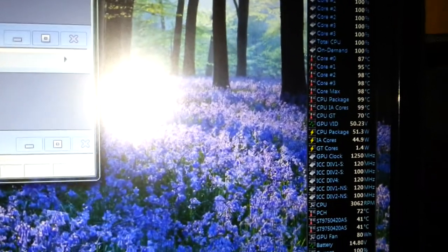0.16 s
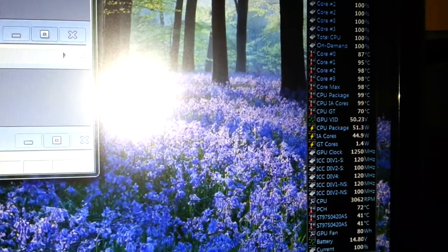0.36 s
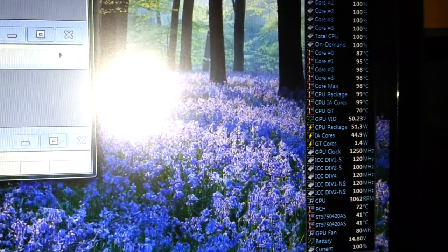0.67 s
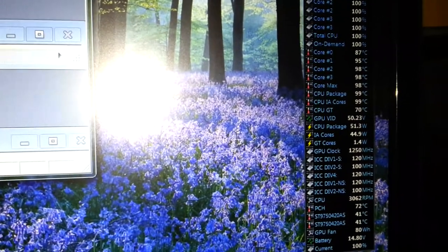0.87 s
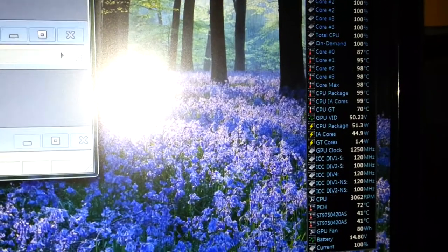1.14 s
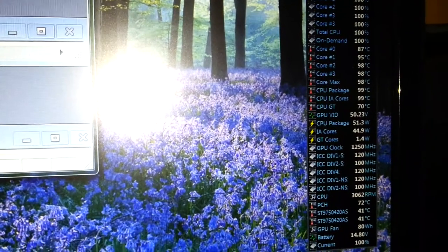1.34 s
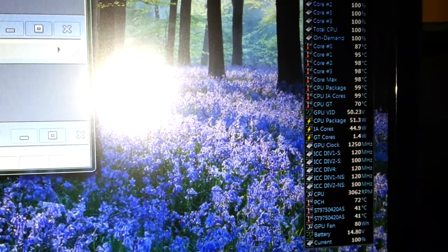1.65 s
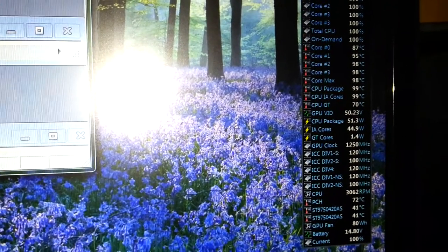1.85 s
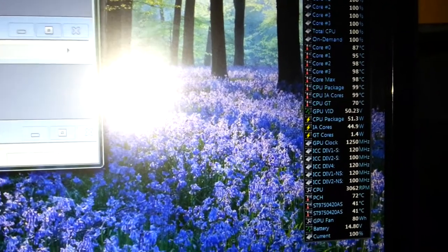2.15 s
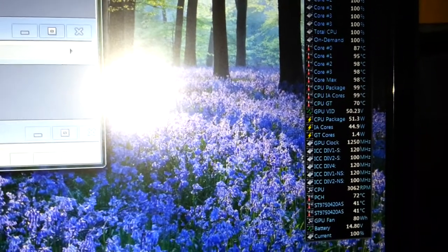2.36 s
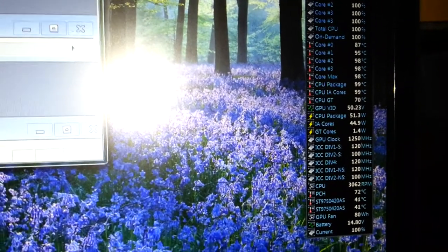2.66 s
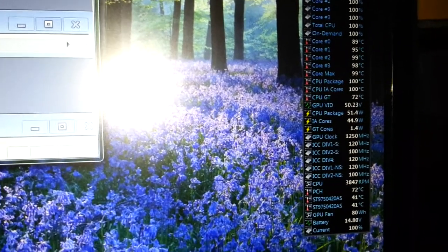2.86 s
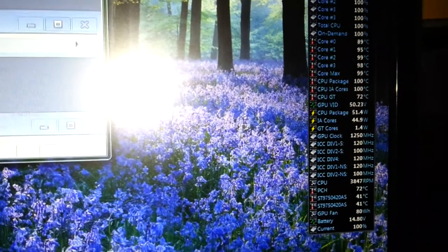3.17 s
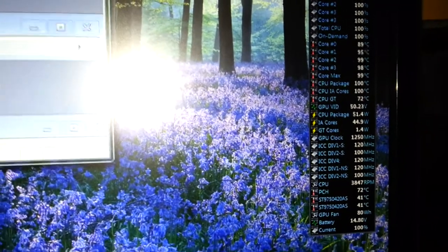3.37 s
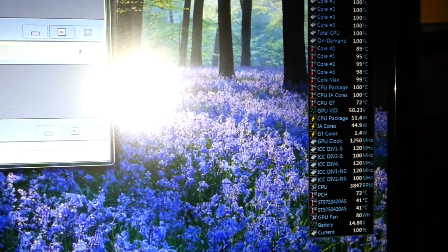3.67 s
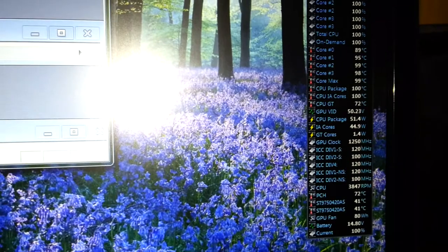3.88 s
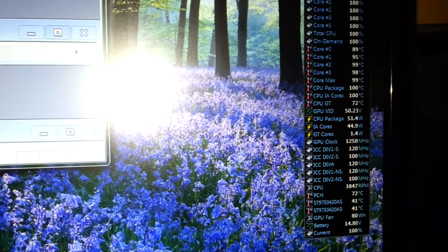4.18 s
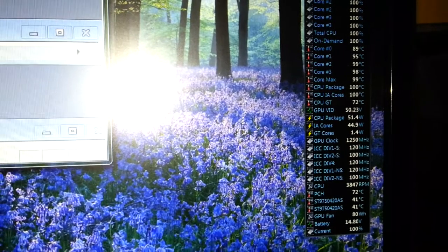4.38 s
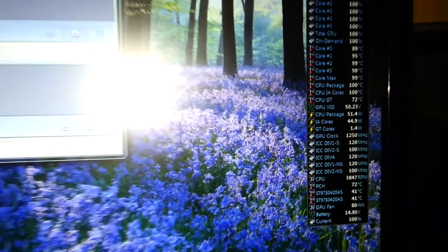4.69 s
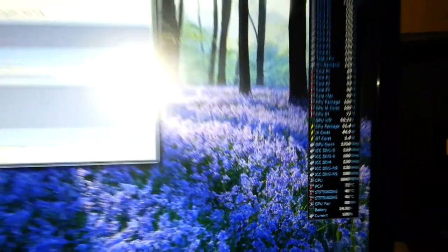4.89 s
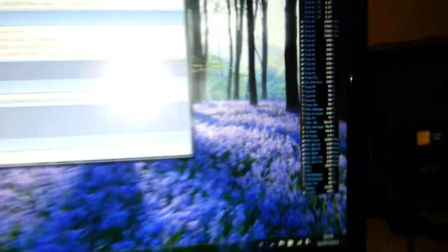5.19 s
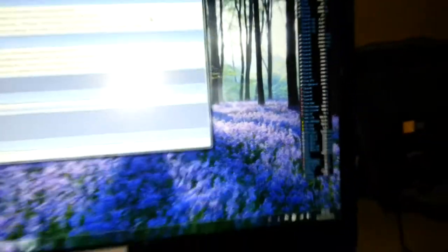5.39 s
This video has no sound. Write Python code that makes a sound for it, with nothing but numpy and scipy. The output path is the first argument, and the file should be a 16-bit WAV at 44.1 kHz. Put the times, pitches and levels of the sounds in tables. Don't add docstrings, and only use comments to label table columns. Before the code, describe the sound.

Close, steady whine and airy rush from a small computer blower, rising about a semitone near the start and softening as the microphone turns away.

```python
import sys
import numpy as np
from scipy import signal
from scipy.fft import rfft, irfft, next_fast_len
from scipy.io import wavfile
from scipy.ndimage import uniform_filter1d

SR = 44100
rng = np.random.default_rng(int(sys.argv[2]) if len(sys.argv) > 2 else 0)


def digitize_waveform(pressure):
    field = np.atleast_2d(pressure).T
    bounded = np.clip(field, -1, 1)
    quanta = np.round(bounded * 32767).astype(np.int16)
    wavfile.write(sys.argv[1], SR, quanta)


def linear_from_db(decibels):
    return 10 ** (np.asarray(decibels, float) / 20)


N = 243873
T = np.arange(N) / SR
SIZE = next_fast_len(N)
HZ = np.arange(SIZE // 2 + 1) * SR / SIZE

# before_hz, drift_hz_per_s, step_s, after_hz, settle_s
SPEED_STEP = (1208, 7.0, .71, 1269.4, .28)
BLADE_ORDERS = [
    (1, -40.5, -46.5, -1.53),
    (2, -49.5, -56.5, -1.3),
]
# slow_left_db, slow_right_db, turned_left_db, turned_right_db
ORDER_CHANGES = [
    (-3.5, 0.5, -11.5, -17),
    (1.5, -3, -14, 1),
]
# pitch_hz, left_db_rms, right_db_rms
MOTOR_LINES = [
    (896, -62, -70),
]
# freq_hz, left_db_per_hz, right_db_per_hz, common_share_0_1
RUSH_SPECTRUM = [(62, -109, -107, .05), (108, -108, -104, 0.03), (143, -102, -99, 0.22),
                 (282, -91, -89.5, 0.21), (438, -81, -79, 0.99), (527, -78.5, -78.5, 0.5),
                 (730, -79.5, -76, 1), (1025, -73.5, -77.5, 0.06), (1410, -71, -74, 0.51),
                 (2160, -76.5, -82, 0.24), (3530, -78, -80.5, 0), (4520, -78, -83, 0),
                 (5790, -89.5, -89.5, 0.25), (8730, -89.5, -91.5, 0.34), (11200, -93.5, -94, .1),
                 (14100, -97.5, -97, 0.2)]
# freq_hz, width_hz, left_db_per_hz, right_db_per_hz, turned_left_db, turned_right_db
LOW_RESONANCES = [(795, 108, -71.5, -73, -4, -24), (866, 85, -72, -100, -2, 0),
                  (1190, 91, -96, -71.5, 0, 3.5), (1257, 160, -71, -73.5, 3.5, -1),
                  (1557, 290, -74.5, -89, -3, 0), (1873, 140, -76, -75.5, -15, -2)]
MID_RESONANCES = [(2014, 140, -67, -75.5, 3, 3.3), (2220, 290, -66.5, -89, -1.5, 12),
                  (2170, 83, -80, -85, 0, 5), (2406, 143, -62, -82.5, -4.5, 6),
                  (2586, 110, -72.5, -73.5, -2, 1), (2763, 170, -64, -82, -6, 3)]
HIGH_RESONANCES = [(3200, 210, -84, -89, 2, 3), (3690, 120, -78.5, -86, 7.5, -11),
                   (3800, 140, -75, -92, -5, 0), (4020, 120, -73, -85, -6, 0),
                   (4355, 150, -74, -82.5, -7, -3), (4750, 410, -85, -87.5, -2, -2),
                   (5530, 180, -99, -104, 0, 0), (5970, 200, -92, -91, 0, -6), (6400, 200, -86, -90, 0, -2),
                   (8040, 1600, -95, -103, -17, -2)]
# start_s, peak_db, pitch_hz, t60_s, left_minus_right_db
CASE_TICKS = [
    (3.926, -46, 2600, .012, 6),
]
# freq_hz, threshold_db_per_hz
LINE_THRESHOLD = [(40, -102), (120, -98), (220, -101), (400, -120), (7000, -115), (8500, -94),
                  (10000, -91.5), (12000, -92.5), (14500, -93.5)]

FULL_HZ = SPEED_STEP[3]
FLOW_POWER = 3.2
CLOSER_DB_PER_S = 0.28
TURN_START_S, TURN_END_S = 4.57, 5.51
RUSH_TURNED_DB, DUCT_TURNED_DB = -2, -3
TONE_TURN_POWER = 3.1
LAG_S, LAG_FROM_HZ = 0.000376, 1043
DUCT_SHARE = 0.82
STEADY_ABOVE_HZ = 9500


def walk(rate_hz):
    hold = int(SR / rate_hz)
    levels = np.repeat(rng.standard_normal(N // hold + 1), hold)
    return 1.25 * uniform_filter1d(uniform_filter1d(levels, hold), hold)[:N]


def stereo_noise(gain, share):
    common, *own = rfft(rng.standard_normal((3, SIZE)))
    lag_s = LAG_S / (1 + (LAG_FROM_HZ / (HZ + 1)) ** 8)
    late = np.exp(-2j * np.pi * HZ * lag_s)
    share = np.clip(share, 0, 1)
    shared = np.sqrt(share) * common * np.array([late, np.ones_like(late)])
    pair = shared + np.sqrt(1 - share) * np.array(own)
    return irfft(pair * gain * np.sqrt(SR / 2), SIZE)[..., :N]


def turned():
    progress = np.clip((T - TURN_START_S) / (TURN_END_S - TURN_START_S), 0, 1)
    return np.sin(np.pi / 2 * progress) ** 2


def motor():
    out = 0
    for pitch_hz, left_db, right_db in MOTOR_LINES:
        level_db = np.array([[left_db], [right_db]]) + 2.9 * walk(2.97)
        out = out + np.sqrt(2) * linear_from_db(level_db) * np.sin(2 * np.pi * pitch_hz * T)
    return out


def ticks():
    out = np.zeros((2, N))
    for start_s, peak_db, pitch_hz, t60_s, pan_db in CASE_TICKS:
        age_s = np.maximum(T - start_s, 0)
        ring = np.sin(2 * np.pi * pitch_hz * age_s) * np.exp(-np.log(1000) * age_s / t60_s)
        out += linear_from_db(peak_db + np.array([[pan_db], [-pan_db]]) / 2) * ring
    return out


def rush(gain):
    freq_hz, *columns = np.transpose(RUSH_SPECTRUM)
    left_db, right_db, share = (np.interp(np.log(HZ + 1), np.log(freq_hz), c) for c in columns)
    pressure = linear_from_db(np.array([left_db, right_db]))
    out = 0
    for centre_hz in 62.5 * 2. ** np.arange(9):
        octave = np.cos(np.pi / 2 * np.clip(np.log2((HZ + 1) / centre_hz), -1, 1))
        fan_share = 1 / (1 + (centre_hz / STEADY_ABOVE_HZ) ** 3)
        swell = linear_from_db(.5 * walk(7)) * gain ** fan_share
        out = out + swell * stereo_noise(pressure * octave, share)
    return out


def duct(turn):
    out = 0
    turn = np.clip(turn, 0, 1)
    for group in (LOW_RESONANCES, MID_RESONANCES, HIGH_RESONANCES):
        power = 0
        for freq_hz, width_hz, left_db, right_db, turned_left_db, turned_right_db in group:
            facing_db = np.array([[left_db], [right_db]])
            away_db = facing_db + np.array([[turned_left_db], [turned_right_db]])
            shape = 1 / (1 + (2 * (HZ - freq_hz) / width_hz) ** 2) ** 2
            power = power + linear_from_db(2 * np.array([facing_db, away_db])) * shape
        facing, away = stereo_noise(np.sqrt(power), DUCT_SHARE)
        out = out + linear_from_db(.5 * walk(5.3)) * ((1 - turn) * facing + turn * away)
    return out


def blade_rate():
    before_hz, drift_hz_per_s, step_s, after_hz, settle_s = SPEED_STEP
    creep_hz = before_hz + drift_hz_per_s * np.minimum(T, step_s)
    rise = 1 - np.exp(-np.maximum(T - step_s, 0) / settle_s)
    return creep_hz + (after_hz - creep_hz) * rise + .35 * walk(5)


def blades(rate_hz, turn):
    phase = 2 * np.pi * np.cumsum(rate_hz) / SR
    slow = (FULL_HZ - rate_hz) / (FULL_HZ - SPEED_STEP[0])
    out = 0
    for (multiple, left_db, right_db, lead_rad), change_db in zip(BLADE_ORDERS, ORDER_CHANGES):
        slow_db, turned_db = np.reshape(change_db, (2, 2, 1))
        waver_db = .4 * walk(14) + np.array([.3 * walk(8), .5 * walk(8)])
        level_db = np.array([[left_db], [right_db]]) + slow * slow_db
        level_db = level_db + turn ** TONE_TURN_POWER * turned_db + waver_db
        tone = np.sin(multiple * phase + np.array([[lead_rad], [0]]))
        out = out + np.sqrt(2) * linear_from_db(level_db) * tone
    return out


def scene():
    rate_hz, turn = blade_rate(), turned()
    flow = (rate_hz / FULL_HZ) ** FLOW_POWER
    near = linear_from_db(CLOSER_DB_PER_S * (T - T[-1] / 2))
    air = rush(flow * linear_from_db(RUSH_TURNED_DB * turn))
    ringing = flow * near * linear_from_db(DUCT_TURNED_DB * turn) * duct(turn)
    return air + ringing + near * blades(rate_hz, turn) + motor() + ticks()


def drop_weak_lines(x):
    size, lead = 1024, 746
    n, count = np.arange(2 * size), N // size + 3
    basis = np.cos(np.pi / size * np.outer(n + .5 + size / 2, np.arange(size) + .5))
    basis *= np.sqrt(2 / size) * np.sin(np.pi * (n + .5) / (2 * size))[:, None]
    blocks = np.pad(x, ((0, 0), (lead + size, count * size - N - lead))).reshape(2, -1, size)
    lines = np.concatenate([blocks[:, :-1], blocks[:, 1:]], axis=2) @ basis
    edge_hz, edge_db = np.transpose(LINE_THRESHOLD)
    line_hz = (np.arange(size) + .5) * SR / 2 / size
    edge_db = np.interp(np.log(line_hz), np.log(edge_hz), edge_db)
    band_db = 2.5 * np.repeat(rng.standard_normal((2, count, size // 32)), 32, axis=2)
    waver_db = np.array([3.5, 0])[:, None, None] + band_db
    keep = np.abs(lines) > linear_from_db(edge_db + waver_db) * np.sqrt(SR / 2)
    frames = (lines * keep) @ basis.T
    blocks = frames[:, 1:, :size] + frames[:, :-1, size:]
    return blocks.reshape(2, -1)[:, lead:lead + N]


def low_pass(x):
    return signal.sosfilt(signal.butter(12, 14600, fs=SR, output="sos"), x)


def record(dry):
    mix = drop_weak_lines(dry) - .0002
    return low_pass(mix)


dry = scene()
out = record(dry)
digitize_waveform(out)
```